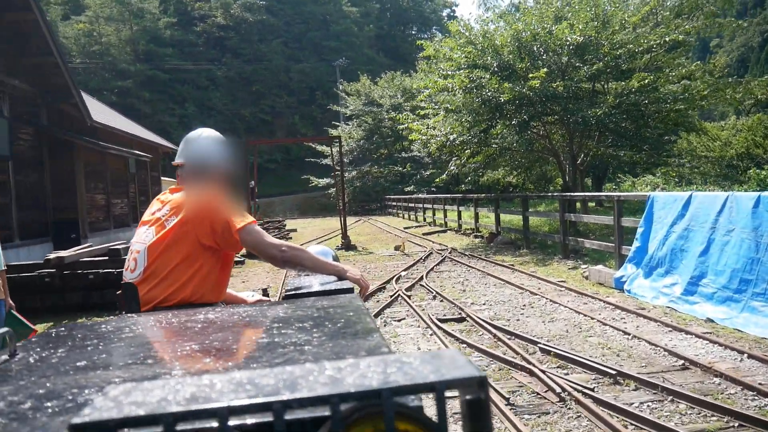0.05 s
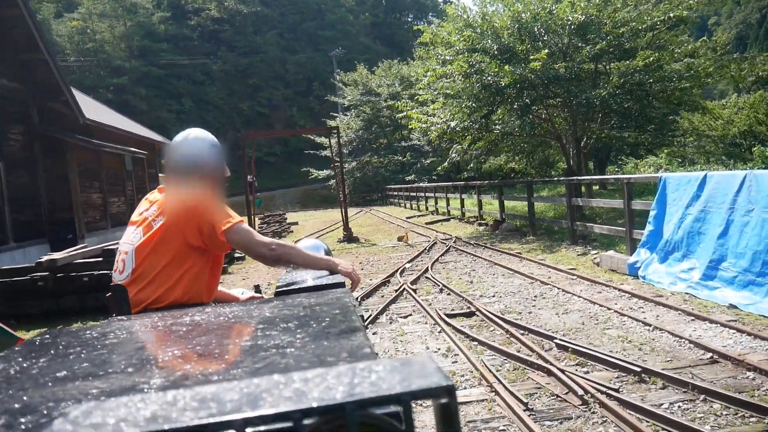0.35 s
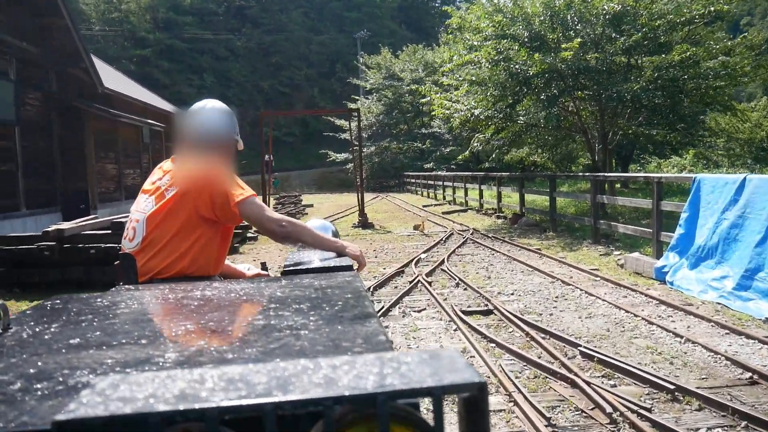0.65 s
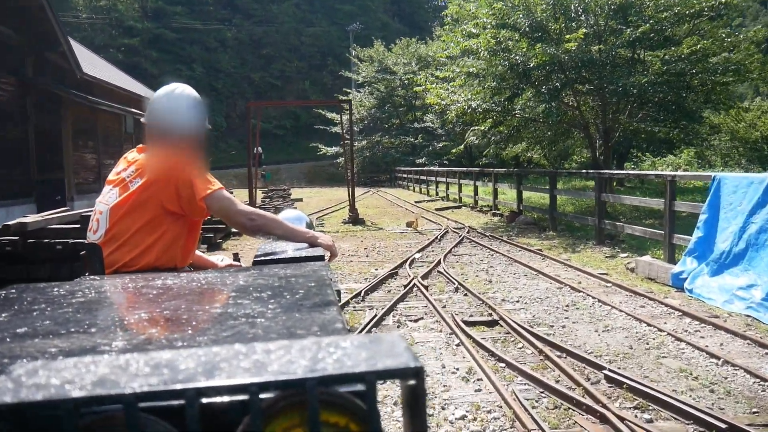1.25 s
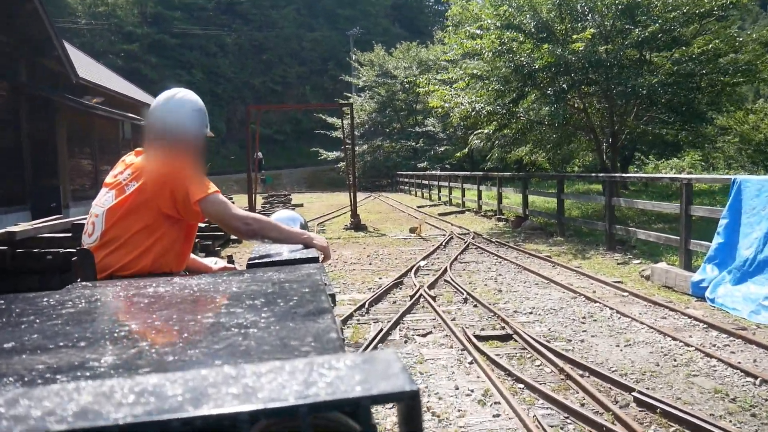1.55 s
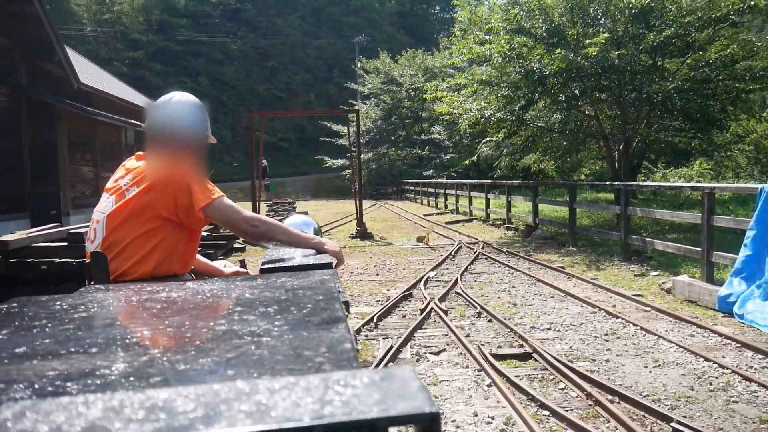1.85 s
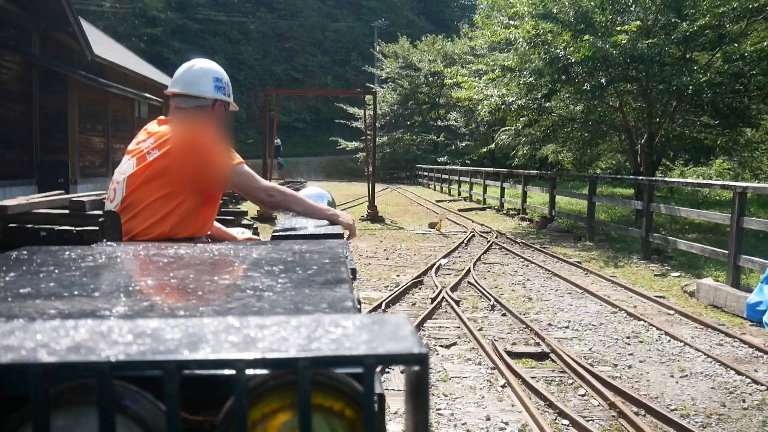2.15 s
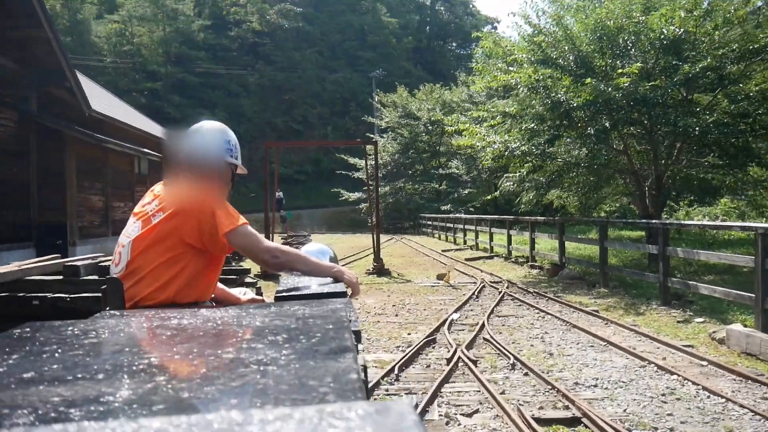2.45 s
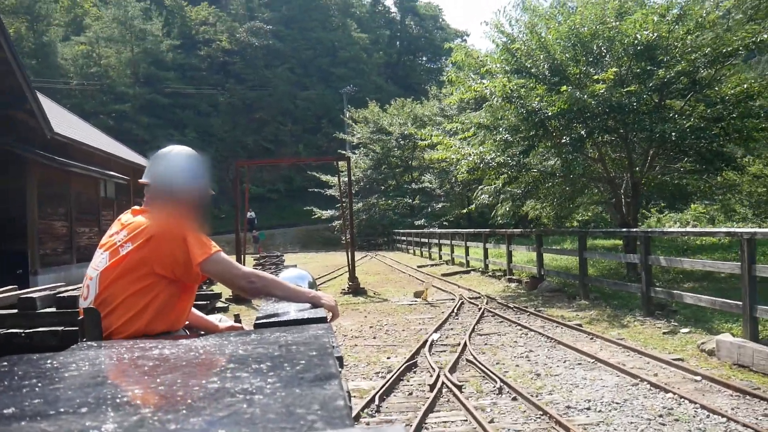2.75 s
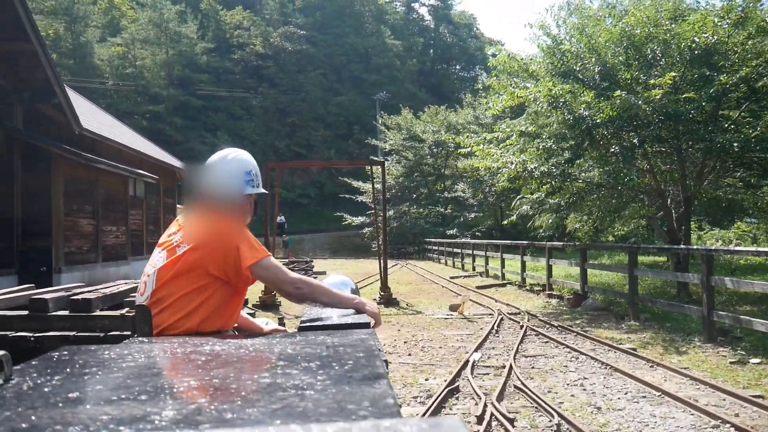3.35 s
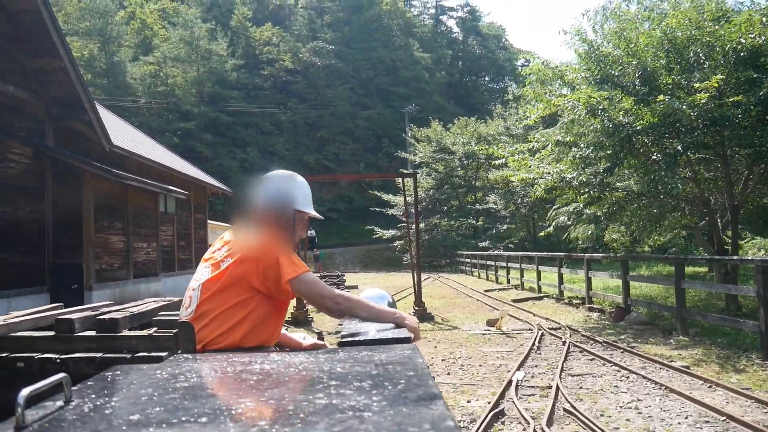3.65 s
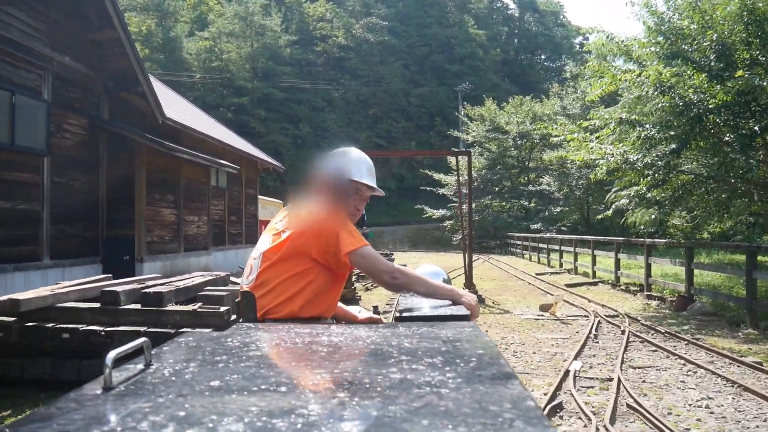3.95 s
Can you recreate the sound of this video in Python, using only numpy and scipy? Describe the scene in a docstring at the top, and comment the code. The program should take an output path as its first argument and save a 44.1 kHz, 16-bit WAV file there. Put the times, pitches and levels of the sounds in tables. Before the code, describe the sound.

A small train rolls slowly with a hollow rumble throughout, heard from on board, while loose metal parts rattle and knock. A steel link clinks twice at about 0.5 seconds, followed by a faint wheel scrape. Three hard thuds come between 1.5 and 1.9 seconds, then more clatter and dull rail joint thumps. A coupling clanks once at 3 seconds, and further jolts follow around 3.3 and 3.7 seconds.

```python
"""Wheels rumble hollowly through the body of a small yard train as it rolls slowly over points.
Rough rails shake the car at its resonances; rail joints thump and hard jolts bottom it out.
Loose couplings and frame parts knock, rattle and ping, a steel link clinks, and an iron coupling clanks once.
The flanges scrape thinly along the rails, over a faint hiss."""
import sys
import numpy as np
from scipy import signal
from scipy.fft import rfft, irfft, next_fast_len
from scipy.io import wavfile

SR = 44100
rng = np.random.default_rng(int(sys.argv[2]) if len(sys.argv) > 2 else 0)


def transcribe(signal):
    """Save signal, clipped to [-1, 1], as a 16-bit WAV file at the path in sys.argv[1]."""
    frames = np.atleast_2d(signal).T
    limited = np.clip(frames, -1, 1)
    pcm = np.round(limited * 32767).astype(np.int16)
    wavfile.write(sys.argv[1], SR, pcm)


N = 176400
TIME = np.arange(N) / SR
CUTOFF_HZ, RING_LIKENESS = 15600, 0.92
STRIKE_RISE_S, CRACK_RISE_S = 0.0012, 0.0017

# stereo image: f/Hz, left-right likeness/correlation
LIKENESS = [(25, -.3), (45, .5), (70, 0.93), (250, 0.99), (500, 0.8), (1000, 0.47), (2200, 0.88),
            (4000, 0.98), (8000, -0.34), (12000, 1)]
# broad colour of the shaken frame: f/Hz, level/dB per Hz
FRAME_SPECTRUM = [(300, -15.5), (620, 10), (1200, 7.5), (1700, 5.5), (2600, 2.5), (3300, -5.5),
                  (4300, -13.5), (5100, -22.5), (5800, -35), (7500, -24), (10000, -34.5), (14000, -58)]
# resonances of the frame: f/Hz, width/Hz, level/dB
FRAME_MODES = [(1182, 18, -13.5), (1554, 16, -18), (1870, 30, -18.5), (2270, 27, -17), (2970, 84, -21)]
# knocks of couplings and frame: t/s, level/dB, rise/s, t60/s, treble tilt/dB per octave
KNOCKS = [(0.134, -28.5, 0.008, 0.26, -2), (0.169, -25.5, 0.005, 0.23, -2),
          (0.199, -24.5, 0.0091, 0.24, -4.5), (0.321, -24, 0.0072, 0.11, -4.5),
          (0.407, -20, 0.0047, 0.18, 0), (0.469, -22.5, .004, 0.37, -7), (0.516, -16.5, .002, 0.048, 1),
          (0.586, -19.5, 0.0048, 0.16, -4), (0.612, -18.5, 0.0012, 0.23, 2.5), (.764, -23, 0.017, 0.72, -8),
          (0.865, -22.5, 0.0085, 0.31, 3.5), (0.929, -20, 0.0088, 0.17, -4.5),
          (1.153, -27.5, .01, 0.18, -1.5), (1.424, -21, 0.018, 0.16, -1.5), (1.464, -25, 0.0043, 0.36, -8),
          (1.531, -22.5, 0.0055, 0.09, -2.5), (1.641, -28.5, 0.0054, 0.27, -2.5),
          (1.674, -28, 0.014, 0.21, -10.5), (1.776, -20, 0.0061, 0.22, -5), (1.996, -28, 0.0062, 0.23, -2),
          (2.097, -19.5, 0.022, 0.11, 3.5), (2.142, -17.5, 0.014, 0.25, 0.5),
          (2.224, -23.5, .008, 0.21, 4.5), (2.245, -17.5, 0.0041, 0.037, 3), (2.329, -30, 0.0039, 0.4, -6),
          (2.443, -30, 0.01, 0.27, -6), (2.602, -25.5, 0.0041, 0.16, -8), (2.874, -28, 0.031, 0.15, 1),
          (3.046, -12, 0.0092, 0.15, -1.5), (3.307, -22, 0.0031, 0.22, -7), (3.645, -28.5, .015, 0.38, 1.5),
          (3.669, -26.5, 0.0094, 0.21, 0.5), (3.713, -15, 0.003, 0.091, -3), (3.749, -24, 0.0054, 0.12, -1),
          (3.817, -30, .005, 0.14, -3), (3.969, -28.5, 0.0019, 0.68, -3.5)]
# sizzle of steel on steel: f/Hz, level/dB per Hz
STEEL_SPECTRUM = [(4500, -21), (6500, 5.5), (9200, 0.5), (12500, -10), (15000, -19)]


def from_db(db):
    """Decibels to gain."""
    return 10 ** (np.asarray(db) / 20)


def rms_one(x):
    """Scale to rms 1."""
    return x / np.sqrt(np.mean(x ** 2) + 1e-20)


def in_time(rows):
    """Read a curve at every sample."""
    return np.interp(TIME, *np.transpose(rows))


def at_hz(points, hz):
    """Read a curve on a log-frequency axis."""
    f, value = np.transpose(points)
    return np.interp(np.log(hz), np.log(f), value)


def drift(rate_hz):
    """Smooth random wander of rms about 1."""
    hop, settle = 40, 2000
    pole = np.exp(-2 * np.pi * rate_hz * hop / SR)
    noise = rng.standard_normal(N // hop + settle + 2)
    slow = signal.lfilter([1], [1, -2 * pole, pole * pole], noise)[settle:]
    return np.interp(np.arange(N) / hop, np.arange(len(slow)), rms_one(slow))


def white():
    """Two unrelated white noises."""
    return rng.standard_normal((2, N))


def stereo(pair, hz, likeness):
    """Spread two unrelated signals as mid and side, panned by pitch."""
    # panning: f/Hz, left minus right/dB
    balance = [(100, 0.2), (250, 0.3), (500, 1.5), (1000, 4.5), (2000, 1.5), (4000, -1.5), (8000, 0.5),
               (12000, -7.5)]
    signs = np.array([[1], [-1]])
    mid = np.sqrt((1 + likeness) / 2) * pair[0]
    side = np.sqrt((1 - likeness) / 2) * pair[1]
    return (mid + signs * side) * from_db(signs * at_hz(balance, hz) / 2)


def coloured(spectrum, drive):
    """Shape noise in third-octave bands, each fed by drive(hz); rms 1 in gives about rms 1 out."""
    edges = 22 * 2 ** np.arange(0, 9.7, 1 / 3)
    out, power = 0, 0
    for low, high in zip(edges, edges[1:]):
        if high > spectrum[0][0] and low < spectrum[-1][0]:
            hz = np.sqrt(low * high)
            gain = from_db(at_hz(spectrum, hz))
            bandpass = signal.butter(3, [low, high], "band", fs=SR, output="sos")
            band = signal.sosfilt(bandpass, drive(hz) + 1e-18)
            out = out + gain * stereo(band, hz, at_hz(LIKENESS, hz))
            power += gain ** 2 * 2 * (high - low) / SR
    return out / np.sqrt(power)


def resonate(modes, force, wander_db=0):
    """Modes shaken by noise under a force envelope; their shares can wander as the contact moves."""
    out = 0
    for hz, width, db in modes:
        r, w = np.exp(-np.pi * width / SR), 2 * np.pi * hz / SR
        push = white() * force
        if wander_db:
            push = push * from_db(wander_db * np.tanh(drift(rate_hz=4)))
        # each mode rolls off from about an octave above its pitch
        skirt = signal.butter(2, min(hz * 2.05, CUTOFF_HZ), fs=SR, output="sos")
        resonator = [1, 0, -1, 1, -2 * r * np.cos(w), r * r]
        ring = signal.sosfilt(np.vstack([skirt, resonator]), push + 1e-18)
        out = out + from_db(db) * np.sqrt((1 - r * r) / 2) * stereo(ring, hz, RING_LIKENESS)
    return out


def blow(s, db, rise, t60):
    """Envelope of one contact: it swells to its peak at time s, then dies away."""
    t = TIME - s
    log_level = np.minimum(t / rise, -np.log(1000) * t / t60)
    return np.exp(np.maximum(log_level, -30)) * from_db(db)


def taps(per_s, decay_s, spread_db):
    """Force of tiny contacts that come at random and die quickly; rms 1."""
    hits = rng.random(N) < per_s / SR
    strength = from_db(spread_db * np.minimum(rng.exponential(1, N), 3))
    return rms_one(signal.lfilter([1], [1, -np.exp(-1 / (decay_s * SR))], hits * strength))


def struck(modes, s):
    """One hard strike at time s: every mode starts at once and dies at its own rate."""
    t, out = np.clip(TIME - s, 0, 1), 0
    for hz, db, t60 in modes:
        angle = 2 * np.pi * (hz * t + rng.random())
        tone = stereo([np.sin(angle), np.cos(angle)], hz, RING_LIKENESS)
        out = out + tone * np.exp(-np.log(1000) * t / t60) * from_db(db)
    return out * (1 - np.exp(-t / STRIKE_RISE_S))


def metallic(x):
    """Sound runs to and fro in the steel, giving a dense comb of fine resonances."""
    # echoes in the steel: round trip/s, share kept
    echoes = [(.0023, .45), (.0037, 0.49), (.0079, 0.31)]
    size = next_fast_len(N + SR // 4)
    spectrum, hz = rfft(x, size), np.arange(size // 2 + 1) * SR / size
    for trip_s, kept in echoes:
        delay = np.exp(-2j * np.pi * hz * trip_s)
        spectrum = spectrum * np.sqrt(1 - kept ** 2) / (1 + kept * delay)
    return irfft(spectrum, size)[:, :N]


def hiss():
    """A faint, steady bed of high hiss."""
    # colour of the hiss: f/Hz, level/dB per Hz
    spectrum = [(4000, -7.5), (6000, -1), (9000, -0.5), (12000, -4.5), (13500, 6.5), (15500, -19.5)]
    noise = from_db(-64.5) * coloured(spectrum, lambda hz: white())
    return signal.sosfilt(signal.butter(8, 13300, fs=SR, output="sos"), noise)


def flange_scrapes():
    """Flanges rub the rail: a thin, gritty sizzle with the wheel's ring in it."""
    # flange contacts: t/s, level/dB, rise/s, t60/s
    rubs = [(.735, -58, 0.022, .5), (.792, -50.5, 0.021, 0.41), (.866, -51, 0.0066, 0.44),
            (.915, -55, .015, .4), (1.15, -58.5, 0.026, 0.2), (1.513, -55, .004, .06),
            (1.532, -53, 0.0021, 0.055), (2.06, -57, 0.016, 0.34), (2.132, -50, 0.012, 0.24),
            (2.165, -46.5, .006, 0.081), (2.23, -60, .008, .35), (3.12, -59.5, 0.024, 0.69),
            (3.59, -61, 0.035, 0.35), (3.68, -52, .012, 0.29)]
    # resonances of the wheel: f/Hz, level/dB
    wheel_modes = [(6220, -16), (6520, -12.5), (6910, -10.5), (7520, -10), (7790, -14), (8165, -9.5),
                   (9150, -8.5), (10300, -12.5), (10900, -14), (12300, -15.5)]
    width_hz = 35
    envelope = np.sqrt(sum(blow(*rub) ** 2 for rub in rubs))
    force = envelope * taps(per_s=420, decay_s=0.002, spread_db=3)
    sizzle = metallic(coloured(STEEL_SPECTRUM, lambda hz: white() * force))
    ring = resonate([(hz, width_hz, db) for hz, db in wheel_modes], force, wander_db=1)
    return from_db(-3) * sizzle + ring


def chatter():
    """Small loose parts keep the frame rattling with many tiny contacts."""
    # strength of the rattle: t/s, level/dB
    levels = [(0.0, -36.5), (0.19, -46), (0.31, -36), (0.76, -30.5), (0.95, -41.5), (1.16, -34.5),
              (1.41, -37), (1.61, -32), (1.85, -34.5), (2.05, -47), (2.55, -41.5), (2.73, -40),
              (2.99, -35.5), (3.36, -37.5), (3.7, -35.5), (4.0, -38.5)]
    force = taps(per_s=1200, decay_s=0.0084, spread_db=5) * from_db(in_time(levels) - 3)
    rattle = coloured(FRAME_SPECTRUM, lambda hz: white() * force)
    return rattle + resonate(FRAME_MODES, force, wander_db=9)


def pings():
    """Small loose parts ring at one pitch each; the shorter the ring, the wider its band."""
    # pinging parts: t/s, level/dB, f/Hz, t60/s
    parts = [(0.517, -27, 2600, 0.037), (.516, -28.5, 3145, 0.043), (2.228, -58, 8200, 0.35),
             (3.393, -41.5, 2740, 0.11), (3.465, -41, 2730, 0.075), (3.58, -62, 7370, .3),
             (3.788, -38, 3880, 0.012), (3.826, -37, 3770, 0.014)]
    out = 0
    for s, db, hz, t60 in parts:
        width_hz = 2.9 / t60
        ring = rms_one(resonate([(hz, width_hz, 0)], force=1))
        out = out + ring * blow(s, db, rise=0.002, t60=t60)
    return out


def link_clinks():
    """A steel link is struck: a crack and a bright, short ring."""
    # steel striking steel: t/s, level/dB
    strikes = [(0.517, -13), (0.612, -0.5)]
    # partials of the link: f/Hz, level/dB, t60/s
    modes = [(2100, -17, 0.079), (2920, -22.5, 0.1), (3600, -34, 0.18), (3880, -23, 0.06), (4360, -27, .1),
             (4750, -38.5, 0.2), (5044, -33, 0.078), (5670, -41, .08), (6470, -38, 0.077), (8000, -43, .12),
             (8860, -48, .1), (9868, -57, .08), (11500, -52, .11), (12780, -50, .09)]
    ring = sum(from_db(db + 0.5) * struck(modes, s) for s, db in strikes)
    force = sum(blow(s, db - 37, CRACK_RISE_S, t60=0.11) for s, db in strikes)
    crack = metallic(coloured(STEEL_SPECTRUM, lambda hz: white() * force))
    return ring + crack


def coupling_clank():
    """The heavy iron coupling runs up hard, clanks once and rings."""
    # partials of the coupling: f/Hz, level/dB, t60/s
    modes = [(1141, -22, 0.31), (1190, -25.5, 0.27), (1480, -29, 0.12), (2700, -30, 0.14),
             (3300, -43, 0.73)]
    return from_db(-0.5) * struck(modes, s=3.046)


def knocks():
    """Couplings and frame take up their slack in short, gritty clatters."""
    powers = np.array([blow(s, db, rise, t60) ** 2 for s, db, rise, t60, _ in KNOCKS])
    tilts, pivot_hz = np.array(KNOCKS)[:, -1], 1800
    grain_db = 2 * np.tanh(drift(rate_hz=240))
    grit = rms_one(from_db(grain_db)) * from_db(-5)

    def band_force(hz):
        """Each knock has its own brightness, and each band flickers on its own."""
        envelope = np.sqrt(from_db(tilts * np.log2(hz / pivot_hz)) ** 2 @ powers)
        return white() * grit * envelope * from_db(2.5 * drift(rate_hz=8))

    clatter = coloured(FRAME_SPECTRUM, band_force)
    ring = resonate(FRAME_MODES, grit * np.sqrt(powers.sum(axis=0)), wander_db=9)
    return clatter + ring


def knock_snaps():
    """Each knock has one brief, dry snap of contact at its peak."""
    # colour of the snap: f/Hz, level/dB per Hz
    spectrum = [(1000, -7.5), (2500, 9), (4500, -7), (6000, -22), (9000, -25), (13000, -40.5)]
    force = sum(blow(s, db - 10.5, CRACK_RISE_S, t60=0.03) for s, db, *_ in KNOCKS)
    return coloured(spectrum, lambda hz: white() * force)


def joint_thumps():
    """Wheels drop over rail joints, each drop a dull burst of noise in the body."""
    # rail joints: t/s, level/dB, rise/s, t60/s, centre f/Hz
    joints = [(0.209, -12.5, 0.021, 0.037, 300), (0.519, -22, 0.0027, 0.18, 595),
              (1.389, -11, 0.0085, .07, 303), (2.113, -16.5, 0.011, 0.28, 574),
              (2.511, -15, .003, 0.075, 305), (2.753, -9, 0.016, 0.071, 302), (3.645, -16, .015, 0.15, 247),
              (3.72, -7, 0.0057, 0.1, 244), (3.717, -12.5, 0.0013, 0.14, 600)]
    edge_ratio, out = 1.3, 0
    for s, db, rise, t60, hz in joints:
        bandpass = signal.butter(3, [hz / edge_ratio, hz * edge_ratio], "band", fs=SR, output="sos")
        boom = rms_one(signal.sosfilt(bandpass, white()))
        out = out + stereo(boom, hz, at_hz(LIKENESS, hz)) * blow(s, db, rise, t60)
    return out


def body_jolts():
    """The body bottoms out with a short, hard thud, swinging for only a cycle or two."""
    # jolts: t/s, level/dB, f/Hz
    thuds = [(1.5309, -1.5, 343), (1.734, -7.5, 277), (1.8835, -5.5, 292), (3.312, -7.5, 270),
             (3.718, -3.5, 290)]
    swing = 0
    for s, db, hz in thuds:
        swing = swing + np.sin(2 * np.pi * hz * (TIME - s)) * blow(s, db, STRIKE_RISE_S, t60=0.011)
    return 2 * signal.sosfilt(signal.butter(2, 137, "high", fs=SR, output="sos"), swing)


def wheel_rumble():
    """Wheels on rough rails shake the car, which booms at its hollow resonances."""
    # strength of the rolling: t/s, level/dB
    rolling = [(0.0, -10), (0.05, -15), (0.12, -16), (0.14, -13), (1.11, -16.5), (1.35, -13), (2.34, -16.5),
               (2.56, -14), (2.58, -17), (2.85, -13), (2.95, -20.5), (3.0, -15.5), (3.48, -18.5),
               (3.73, -12.5), (3.75, -17.5), (4.0, -15)]
    # colour of the rumble: f/Hz, level/dB per Hz
    spectrum = [(25, -38), (50, -36.5), (75, -18.5), (110, -1.5), (160, -1), (230, -3), (330, -1),
                (450, -8.5), (620, -12), (1000, -24.5), (1500, -41), (2500, -41), (5000, -76)]
    # deep bass against the rest of the rumble: t/s, level/dB
    bass_swell = [(0, -5.5), (.7, -1.5), (1.3, 3), (1.8, -2.5), (2.3, -4), (2.9, -0.5), (3.3, 0.5),
                  (3.7, 4.5), (4, -2)]
    # hollow resonances of the car body: f/Hz, width/Hz, level/dB
    body_modes = [(125.9, 4, -16.5), (161.9, 4.3, -12.5), (226.2, 8.1, -12), (283.6, 20, -5.5),
                  (362.4, 24, -8.5), (493.6, 23, -17.5), (1205, 29, -40.5)]
    bass_db, bass_below_hz, flutter_db = in_time(bass_swell), 150, 2.09

    def band_force(hz):
        """Each band flutters on its own; the deep ones also swell and sink together."""
        return white() * from_db(flutter_db * drift(rate_hz=16) + bass_db * (hz < bass_below_hz))

    roar = coloured(spectrum, band_force)
    bandpass = signal.butter(2, [90, 1500], "band", fs=SR, output="sos")
    boom = signal.sosfilt(bandpass, resonate(body_modes, force=1))
    return from_db(in_time(rolling)) * (from_db(-3) * roar + from_db(0.5) * boom)


def scene():
    """The rumbling car, its loose ironwork and the track beneath, over a faint hiss."""
    bed = hiss() + wheel_rumble()
    ironwork = chatter() + knocks() + coupling_clank() + link_clinks() + pings()
    track = joint_thumps() + body_jolts() + flange_scrapes()
    return bed + ironwork + track + knock_snaps()


def record(dry):
    """The highest peaks clip, and the top of the treble is cut."""
    clipped = np.clip(dry, -0.89, 0.89)
    return signal.sosfilt(signal.cheby2(14, 60, CUTOFF_HZ, fs=SR, output="sos"), clipped)


dry = scene()
out = record(dry)
transcribe(out)
```